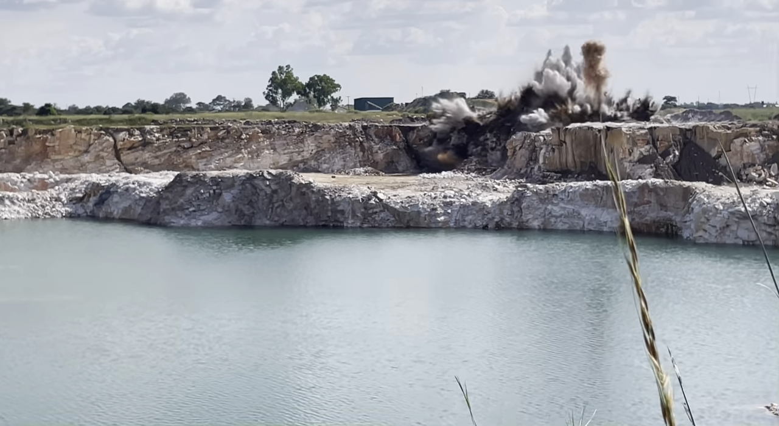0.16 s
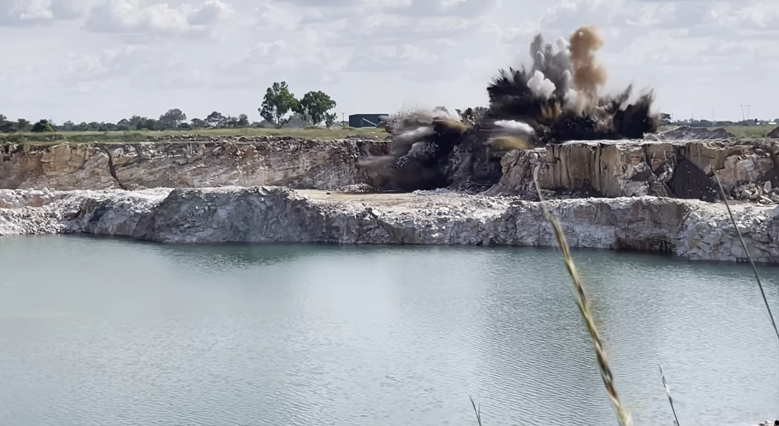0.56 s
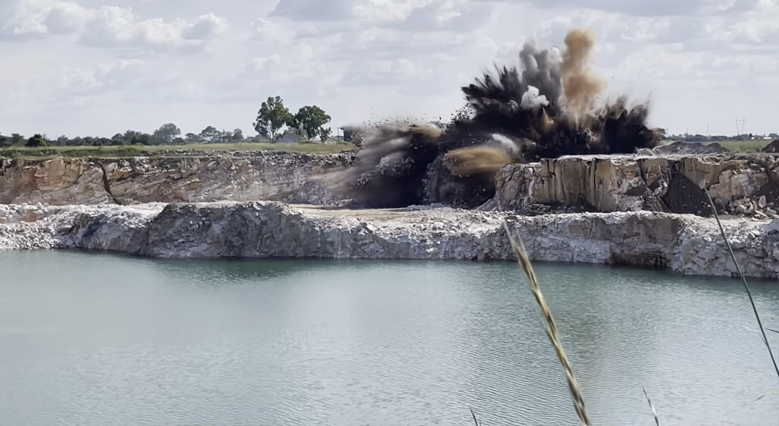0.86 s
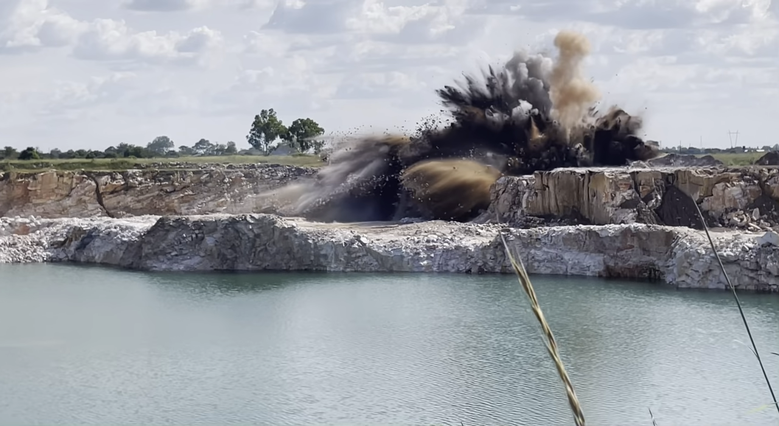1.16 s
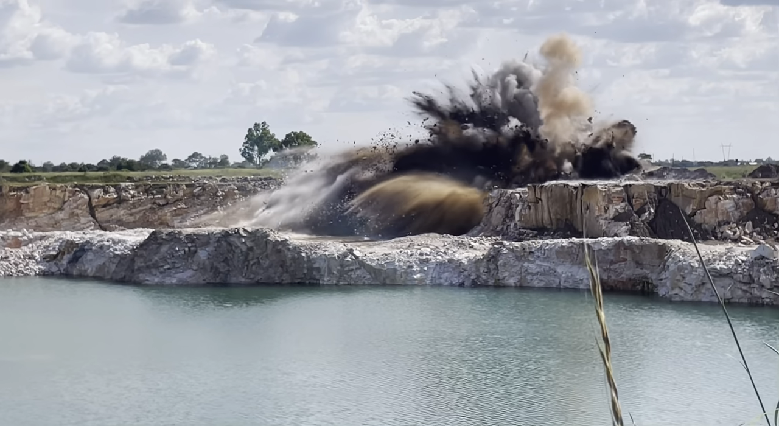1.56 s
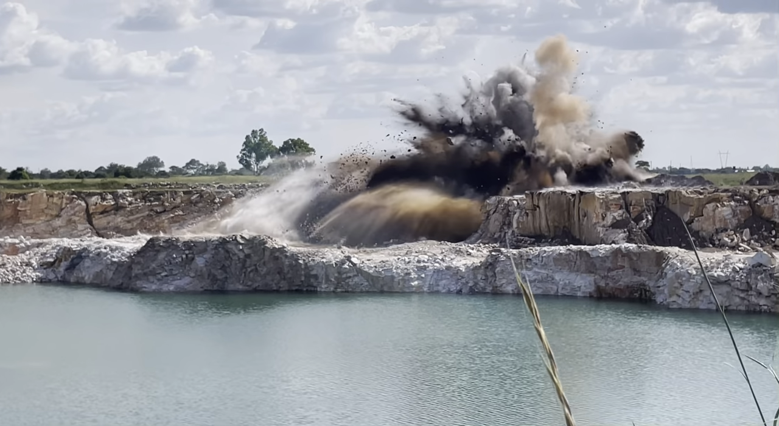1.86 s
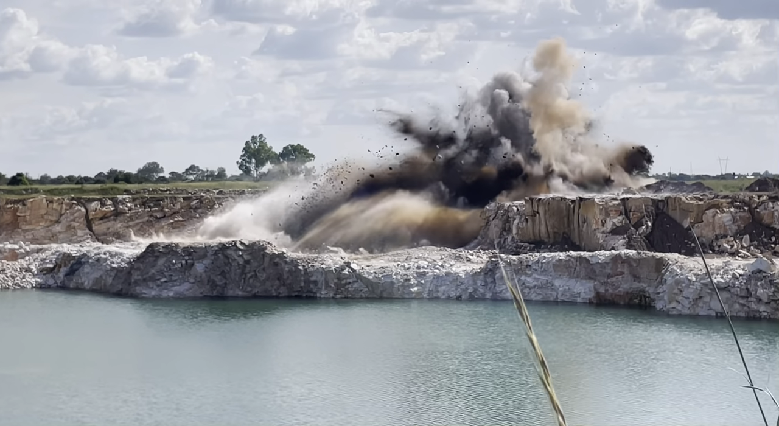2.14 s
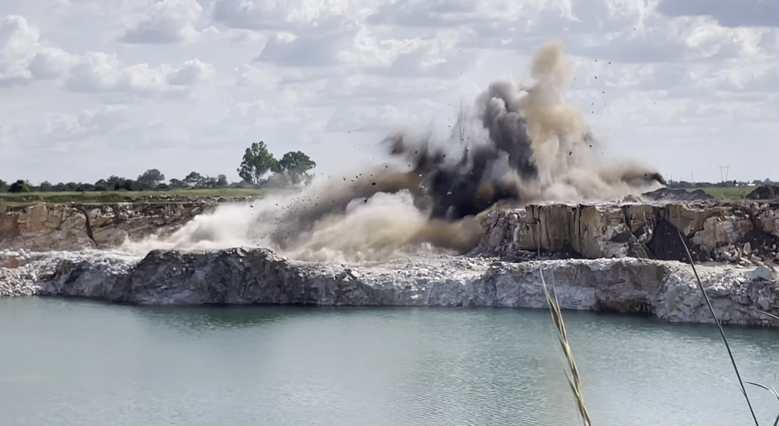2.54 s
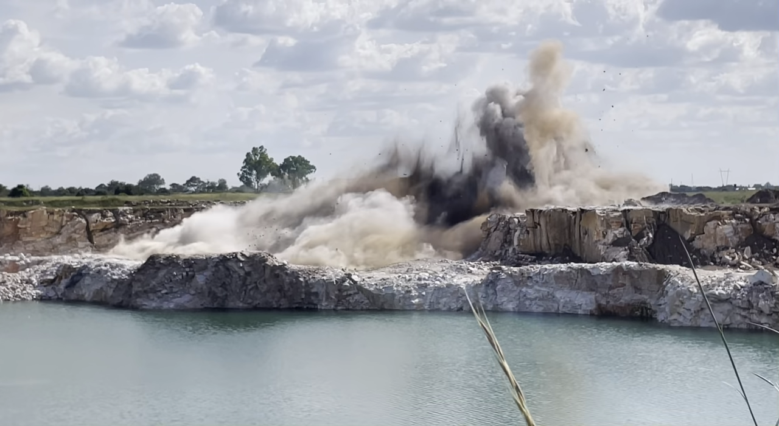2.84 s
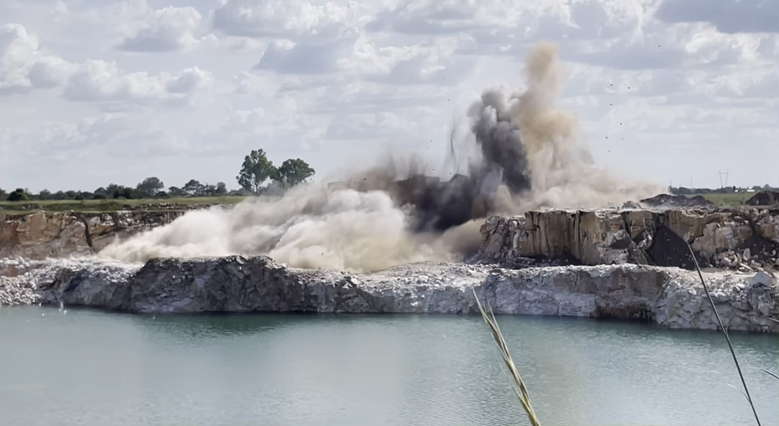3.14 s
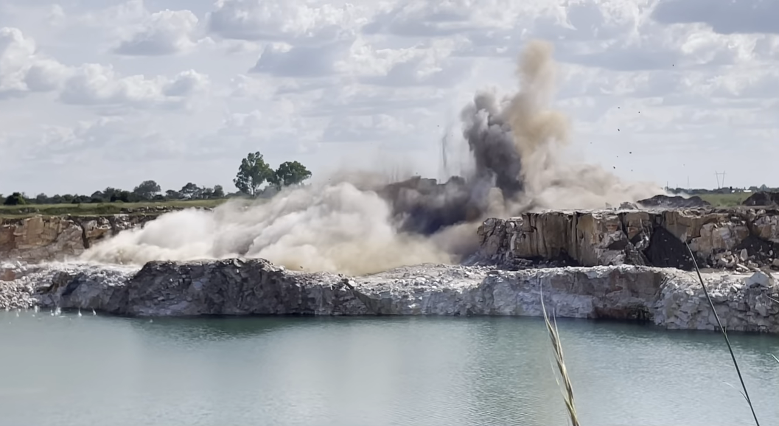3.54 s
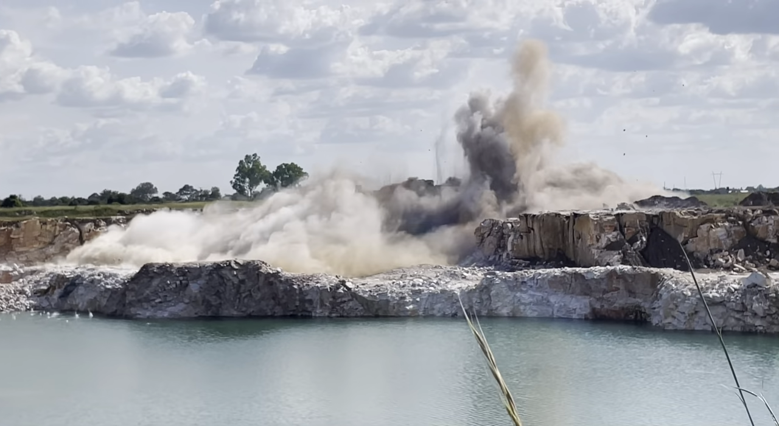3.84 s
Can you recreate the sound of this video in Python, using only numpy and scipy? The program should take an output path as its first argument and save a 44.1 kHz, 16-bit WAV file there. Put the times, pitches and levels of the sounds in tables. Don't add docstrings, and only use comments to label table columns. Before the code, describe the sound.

A quarry blast across open water starts with deep, rapid ground thumps and rumble, under a faint bird whistle and thin insect buzz. Sharp cracks hit at 0.62 and 0.70 seconds, the second with a brief sizzling tail, softly overloading the microphone. A stuttering wall echo roars around 0.95-1.25. From 1.3 broken rock rushes and clatters with low thuds, fullest near 2.6, thinning until 4.

```python
import sys
import numpy as np
from scipy import signal
from scipy.fft import rfft, irfft
from scipy.io import wavfile
from scipy.ndimage import uniform_filter1d

SR = 44100
rng = np.random.default_rng(int(sys.argv[2]) if len(sys.argv) > 2 else 0)


def level_to_linear(level):
    exponent = np.asarray(level, float) / 20
    return 10 ** exponent


def digitize_waveform(pressure):
    field = np.atleast_2d(pressure).T
    bounded = np.clip(field, -1, 1)
    quanta = np.round(bounded * 32767).astype(np.int16)
    wavfile.write(sys.argv[1], SR, quanta)


N = 176400
T = np.arange(N) / SR


def evened(x):
    return x / np.sqrt(np.mean(x ** 2) + 1e-20)


def read(points, hz):
    f, value = np.transpose(points)
    return np.interp(np.log(hz + 1), np.log(f + 1), value)


def add(mix, s, sound):
    part = mix[max(round(s * SR), 0):][:len(sound)]
    part += sound[:len(part)]


def resonate(x, hz, width_hz):
    turn = np.exp(2j * np.pi * np.cumsum(hz * np.ones(len(x))) / SR)
    r = np.exp(-np.pi * width_hz / SR)
    return 2 * (turn * signal.lfilter([1 - r], [1, -r], x / turn)).real


def lifts(rows):
    lift_db = np.zeros(N)
    for s, db, fade in rows:
        attack = np.clip((T - s) / 0.00083, 0, 1)
        lift_db += db * np.exp(-np.maximum(T - s, 0) / fade) * attack
    return level_to_linear(lift_db)


def port_half(hz):
    # frequency in Hz, phase by which the left port leads in radians.
    lead = [(100, 0), (860, .3), (2100, 0), (3000, .5), (5400, 0), (8800, -3.14), (10500, -4.8),
            (12000, -6.1)]
    # frequency in Hz, left minus right level in dB.
    lean = [(60, -0.5), (300, 0.5), (800, 1.5), (2100, 0.5), (4500, 0), (9000, -0.5), (12000, -0.5)]
    return level_to_linear(read(lean, hz) / 2) * np.exp(.5j * read(lead, hz))


def ports(x):
    half = port_half(np.fft.rfftfreq(N, 1 / SR))
    return np.array([irfft(rfft(x) * half, N), irfft(rfft(x) / half, N)])


def wash(tone, tilt, patchy_db, flicker_db, same, size):
    # frequency in Hz, likeness of left and right from 0 to 1.
    likeness = [(60, 1), (300, 0.96), (800, 0.83), (2100, 0.98), (3100, 0.91), (6000, 0.22), (8800, 1),
                (14000, 0.61)]
    hop = size // 4
    frames, hz = N // hop + 5, np.fft.rfftfreq(size, 1 / SR)
    a, b, c, d, p = rng.standard_normal((frames, len(hz), 5)).T

    patches = uniform_filter1d(p, size=size // 64, axis=0)
    patches = evened(uniform_filter1d(patches, size=2400 // hop, axis=1))
    flicker = evened(uniform_filter1d(rng.standard_normal(frames), size=max(320 // hop, 1)))

    octaves = np.log2((hz + 50) / 1500)
    shape = level_to_linear(read(tone, hz)[:, None] + np.outer(octaves, tilt(np.arange(frames) * hop / SR)))
    shape = shape / np.sqrt((shape ** 2).mean(0))
    shape = shape * level_to_linear(patchy_db * patches + flicker_db * flicker)

    like = np.clip(same * read(likeness, hz), 0, 1)[:, None]
    half = port_half(hz)[:, None]
    left = a + 1j * b
    right = like * left + np.sqrt(1 - like ** 2) * (c + 1j * d)
    z = np.array([left * half, right / half]) * shape
    return evened(signal.istft(z, nperseg=size, noverlap=size - hop)[1][:, :N])


def rush(curve, tone, patchy_db, flicker_db, start_db):
    s, db, tilt = np.transpose(curve)
    times = np.r_[s[0] - .4, s, s[-1] + .4]
    level_db = np.interp(T, times, np.r_[start_db, db, db[-1]])
    noise = wash(tone, lambda t: np.interp(t, s, tilt), patchy_db, flicker_db, same=1, size=512)
    return level_to_linear(level_db) * noise


def low_waves(rows):
    out = np.zeros(N)
    for s, db, hz, half in rows:
        turn = rng.random() * (s > 0)
        t = np.arange(-min(s, 4 * half), 4 * half, 1 / SR)
        swell = np.exp(-.5 * (t / half) ** 2)
        add(out, s + t[0], level_to_linear(db) * swell * np.cos(2 * np.pi * (hz * t + turn)))
    return out


def open_air():
    # frequency in Hz, density in dB per Hz.
    air_tone = [(400, -34), (600, -7.5), (1000, -12), (3000, -16), (5000, -30), (9000, -30), (12000, -26),
                (15500, -35)]
    # start in seconds, lift in dB, fade in seconds.
    puffs = [
        (3.285, 8, .008),
        (3.53, 6, .05),
        (3.69, 7, .015),
    ]
    level_db = -64.5 - 10.0 * np.clip((T - .15) / .3, 0, 1)
    hiss = wash(air_tone, lambda t: 0 * t, patchy_db=-2.0, flicker_db=-2.5, same=0.78, size=1024)
    return level_to_linear(level_db) * hiss * lifts(puffs)


def ground():
    # time in seconds, level in dB.
    rumble_level = [(0.0, -22), (0.28, -23.5), (0.429, -19), (0.58, -18.5), (0.7, -17.5), (.76, -18),
                    (.82, -24.5), (.87, -24), (0.92, -15.5), (1.09, -17), (1.68, -29), (2.23, -34.5),
                    (2.52, -30.5), (2.78, -35.5), (3.21, -31.5), (3.48, -40), (4.0, -38.5)]
    # frequency in Hz, density in dB per Hz.
    rumble_tone = [(20, -36), (40, -5.5), (60, -3.5), (135, -9.5), (270, -24.5), (430, -39), (520, -59),
                   (1000, -90)]
    s, db = np.transpose(rumble_level)
    noise = wash(rumble_tone, lambda t: 0 * t, patchy_db=0.0, flicker_db=0.0, same=0.95, size=4096)
    return level_to_linear(np.interp(T, s, db)) * noise


def quakes():
    # centre in seconds, peak in dB, pitch in Hz, half length in seconds.
    shakes = [(0, -5, 53.7, 0.02), (0.084, -8, 56.3, 0.015), (0.146, -20, 108, 0.036),
              (0.16, -8.5, 58.4, 0.018), (.185, -22, 133, 0.035), (0.211, -11.5, 59, 0.031),
              (.239, -20, 131.7, .02), (0.327, -12, 75.6, 0.014), (0.421, -12, 130.2, 0.022),
              (0.435, -27, 77, 0.012), (.479, -15.5, 181, 0.026), (.489, -10, 136, 0.025),
              (0.531, -20, 262.6, .015), (.575, -8, 131, 0.024), (0.645, -14, 40, 0.0067),
              (0.672, -7, 63.7, 0.012), (.66, -12, 193.4, 0.0143), (0.778, -21.5, 111, 0.0096),
              (0.886, -14, 94.3, 0.022), (0.935, -3, 71.8, 0.012), (1.011, -10, 63.7, 0.034),
              (1.023, -16.5, 185, 0.026), (1.051, -16, 226, 0.012), (1.098, -10.5, 97, 0.015),
              (1.156, -17.5, 67, 0.033), (1.208, -14, 75, 0.027), (1.27, -25.5, 200.7, 0.045),
              (1.297, -16.5, 64, 0.035), (1.393, -21.5, 75.2, 0.061), (1.511, -21, 61.2, 0.068),
              (0.492, -23, 54.4, .015), (0.714, -14.5, 36.2, .01), (0.719, -13, 80.5, .012),
              (.71, -8, 182, .012), (0.982, -13.5, 55.3, .015), (1.427, -17.5, 52, .015),
              (.555, -18.5, 200, .02), (.6, -17.5, 240, .012), (0.852, -27.5, 230, .02),
              (0.442, -18, 70, .015), (0.628, -13, 95, 0.0087)]
    return low_waves(shakes)


def wildlife():
    # start in seconds, length in seconds, level in dB, start pitch in Hz, end pitch in Hz.
    calls = [
        (0.006, .035, -65, 2850, 2850),
        (.1, 0.166, -75, 3100, 2400),
    ]
    insect_hz, insect_db, insect_end_s = 12100, -80.5, 1.1
    out = np.zeros(N)
    for s, length, db, start_hz, end_hz in calls:
        u = np.arange(0, 1, 1 / SR / length)
        hz = start_hz + (end_hz - start_hz) * u
        whistle = resonate(resonate(rng.standard_normal(len(u)), hz, 20), hz, 150)
        add(out, s, level_to_linear(db) * np.sin(np.pi * u) ** .5 * evened(whistle))

    buzz = evened(resonate(resonate(rng.standard_normal(N), insect_hz, 120), insect_hz, 200))
    waver = evened(uniform_filter1d(rng.standard_normal(N), size=2000))
    fade_in_db, fade_out_db = -25 * np.maximum(.45 - T, 0), -30 * np.maximum(T - insect_end_s, 0)
    return out + buzz * level_to_linear(5.0 * waver - 1.5) * level_to_linear(insect_db + fade_in_db + fade_out_db)


def roar():
    # time in seconds, level in dB, tilt in dB per octave.
    roar_curve = [(.02, -84, -1), (.3, -57.5, -5), (.41, -39, -4.5), (.6, -31, -5.5), (.612, -16, -7),
                  (.62, -9, -0.5), (.632, -17, -5), (.7, -26.5, 1), (.715, -18, -3), (.75, -31, 1),
                  (.8, -37.5, -1), (.942, -29.5, 1), (.947, -15.5, 2.5), (.975, -15, -1.5), (1.0, -19, 0),
                  (1.13, -24.5, 0), (1.27, -32.5, -0.5), (1.6, -39.5, -8.5)]
    # frequency in Hz, density in dB per Hz.
    roar_tone = [(90, -21.5), (240, -2.5), (420, -7.5), (800, -9.5), (3000, -26.5), (6400, -39),
                 (8800, -54.5), (13000, -78)]
    # start in seconds, lift in dB (negative
    # for the dip), fade in seconds.
    echoes = [
        (.9575, 5, .012),
        (.9723, 3.5, 0.0086),
        (.993, -1, .01),
        (1.0132, 7.5, 0.014),
        (1.04, 3.5, .012),
        (1.071, 5.5, 0.021),
        (1.093, 2, 0.013),
        (1.1159, 4, .012),
        (1.16, 4, 0.015),
        (1.2262, 3.5, 0.013),
    ]
    noise = rush(roar_curve, roar_tone, patchy_db=1.5, flicker_db=2.0, start_db=-80)
    return noise * np.clip(4 - 2 * T, 0, 1) * lifts(echoes)


def cracks():
    # start in seconds, level in dB, start pitch in Hz, end pitch in Hz, 60 dB decay in seconds.
    blows = [
        (.6148, -9, 750, 1900, .0075),
        (.6178, -7, 380, 340, .028),
        (.6185, -2, 104, 25, .09),
        (.7030, -1, 830, 110, .033),
        (.958, -15, 300, 250, .06),
    ]
    # centre in seconds, peak in dB, width in seconds.
    fronts = [
        (0.7031, 5.5, 0.000016),
        (.7131, -7.5, 0.000041),
        (0.7355, -17, .00003),
        (.7488, -30, 0.000025),
        (0.9482, -23.5, 0.000032),
    ]
    glide_cycles, rise_cycles = 2.05, .2
    out = np.zeros(N)
    for s, db, start_hz, end_hz, t60 in blows:
        t = np.arange(0, t60, 1 / SR)
        hz = end_hz + (start_hz - end_hz) * np.exp(-t * start_hz / glide_cycles)
        rise = np.sin(np.pi / 2 * np.minimum(t * start_hz / rise_cycles, 1)) ** 2
        fall_db = -60 * (t / t60) ** 3
        add(out, s, level_to_linear(db + fall_db) * rise * np.cos(2 * np.pi * np.cumsum(hz) / SR))
    for s, db, width in fronts:
        out += level_to_linear(db) * np.exp(-.5 * ((T - s) / width) ** 2)
    return out


def snaps():
    # centre in seconds, peak in dB, pitch in Hz, half length in seconds.
    rings = [
        (.6208, -10, 1950, 0.00069),
        (.6178, -18, 2300, 0.00049),
        (.6245, -17, 750, 0.00055),
        (.6262, -28, 2200, .001),
        (.627, -11, 1700, .0007),
        (.6155, -11.5, 870, 0.0017),
        (.6225, -14, 1500, .0006),
        (.6232, -24.5, 3500, 0.00058),
        (.6185, -23.5, 3100, 0.00063),
        (.6245, -11, 750, 0.002),
    ]
    out = np.zeros(N)
    for s, db, hz, half in rings:
        swell = np.exp(-.5 * ((T - s) / half) ** 2)
        out += level_to_linear(db) * swell * np.cos(2 * np.pi * hz * (T - s))
    return out


def sizzle():
    start_s, t60_s, level_db, centre_hz = .706, .3, -52.5, 9000
    band = signal.butter(2, [centre_hz / 2, 1.5 * centre_hz], "band", fs=SR, output="sos")
    hiss = evened(signal.sosfilt(band, rng.standard_normal(N)))
    return hiss * level_to_linear(level_db - 60 * np.maximum(T - start_s, 0) / t60_s) * (T > start_s)


def falling_rock():
    # time in seconds, level in dB, tilt in dB per octave.
    fall_curve = [(1.3, -35.5, -1), (1.7, -33, -1.5), (2.0, -30.5, -1), (2.35, -30, .5), (2.65, -29, 0.4),
                  (2.95, -31.5, -0.38), (3.3, -35.5, -.5), (3.6, -37, -1.3), (4.0, -39.5, -1)]
    # frequency in Hz, density in dB per Hz.
    fall_tone = [(90, -23), (190, 1.5), (370, -5.5), (800, -4), (2900, -13.5), (5300, -22.5), (8800, -39.5),
                 (13000, -82.5)]
    # start in seconds, lift in dB, fade in seconds.
    clatter = [(1.3943, 4.4, .015), (1.4582, 4, 0.013), (1.5305, 2.8, 0.027), (1.8453, 2, 0.0074),
               (1.8867, 1.3, 0.01), (2.1865, 2.4, 0.013), (2.29, 2.7, 0.018), (2.3372, 2.3, 0.011),
               (2.39, 1.5, 0.014), (2.58, 1, 0.011), (3.4332, 2.2, 0.011), (3.55, 1.2, 0.02)]
    noise = rush(fall_curve, fall_tone, patchy_db=0.62, flicker_db=0.68, start_db=-42.5)
    return noise * np.clip(T / 1.0 - .5, 0, 1) * lifts(clatter)


def thuds():
    # centre in seconds, peak in dB, pitch in Hz.
    landings = [(1.619, -23, 86), (1.83, -26.5, 74), (1.929, -26.5, 102), (2.004, -23, 92.3),
                (2.079, -22, 65), (2.136, -23, 64.6), (2.268, -19, 59), (2.454, -19, 48.4),
                (2.558, -17, 59.5), (2.66, -23.5, 62.5), (2.721, -31, 64), (3.01, -23.5, 59),
                (3.163, -36, 67), (3.253, -44, 62), (3.352, -34, 70.6), (3.583, -37.5, 90),
                (3.771, -37, 63), (3.851, -34, 64.4), (3.921, -30.5, 67)]
    half_s = 0.013
    return low_waves([(*row, half_s) for row in landings])


def scene():
    wide = open_air() + ground() + roar() + falling_rock()
    low = quakes() + thuds()
    points = wildlife() + cracks() + snaps() + sizzle()
    return wide + low + ports(points)


def low_pass(x):
    return signal.sosfilt(signal.butter(12, 15390, fs=SR, output="sos"), x)


def record(dry):
    low_cut_hz, top_hz, ceiling = 27, 15800, .94
    sos = signal.butter(2, [low_cut_hz, top_hz], "band", fs=SR, output="sos")
    band = signal.sosfiltfilt(sos, dry)
    held = band / (1 + abs(band / ceiling) ** 4) ** (1 / 4)
    return low_pass(held)


dry = scene()
out = record(dry)
digitize_waveform(out)
```